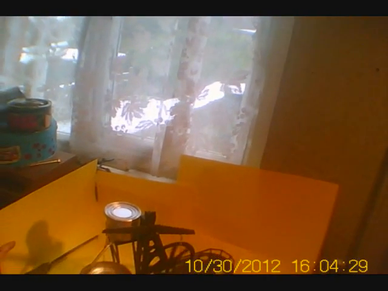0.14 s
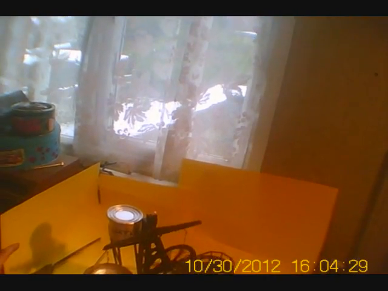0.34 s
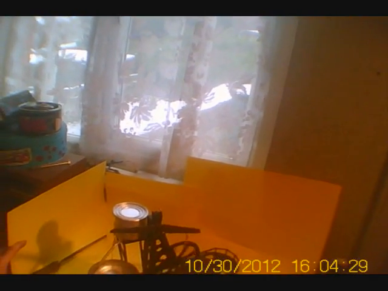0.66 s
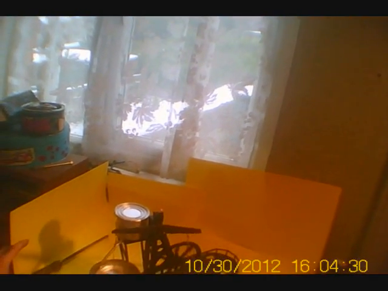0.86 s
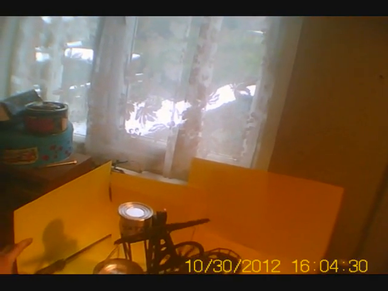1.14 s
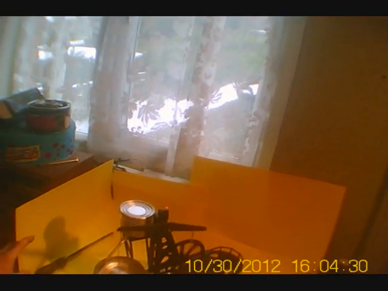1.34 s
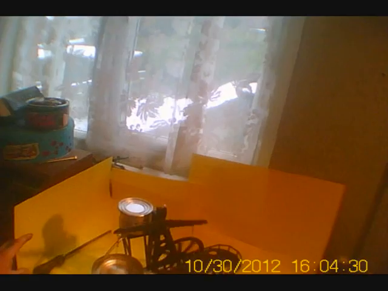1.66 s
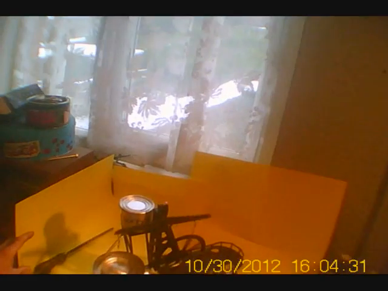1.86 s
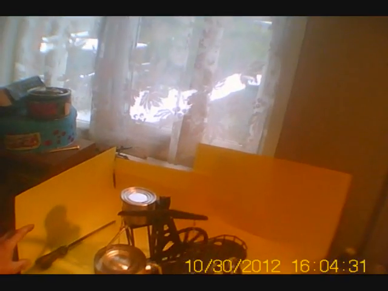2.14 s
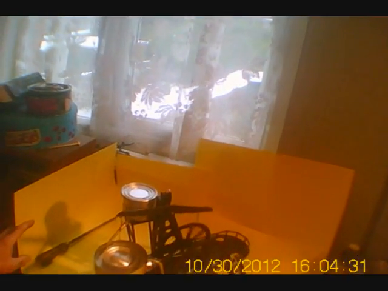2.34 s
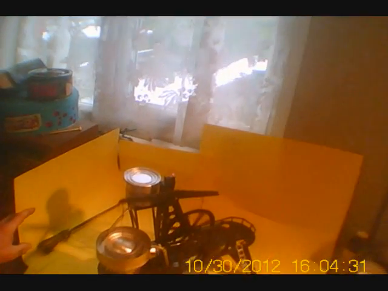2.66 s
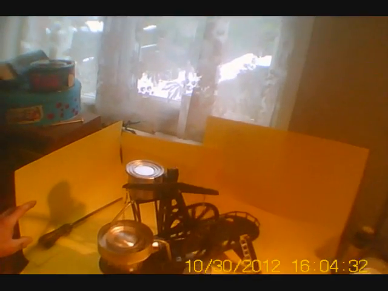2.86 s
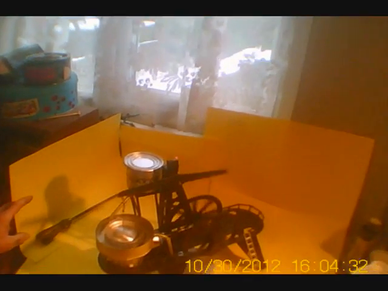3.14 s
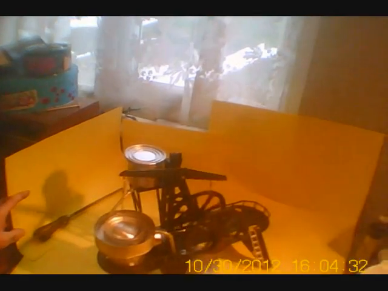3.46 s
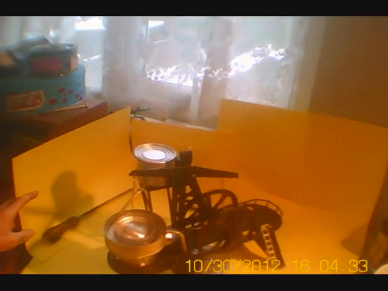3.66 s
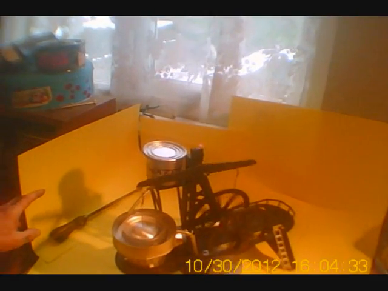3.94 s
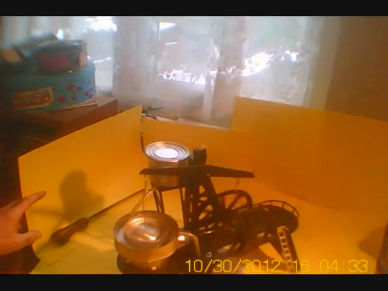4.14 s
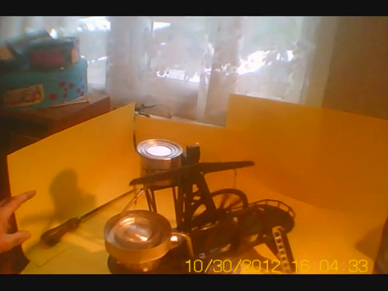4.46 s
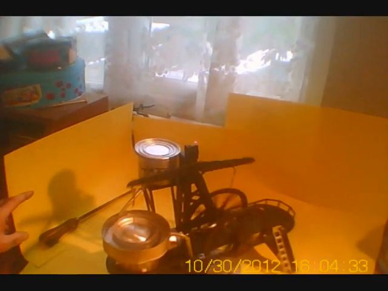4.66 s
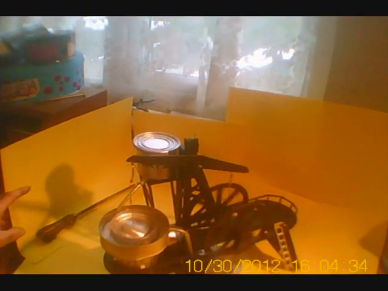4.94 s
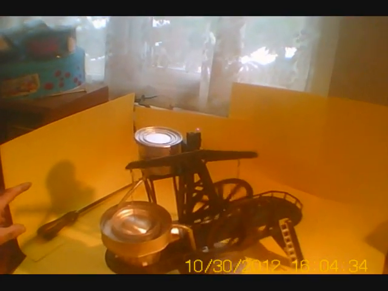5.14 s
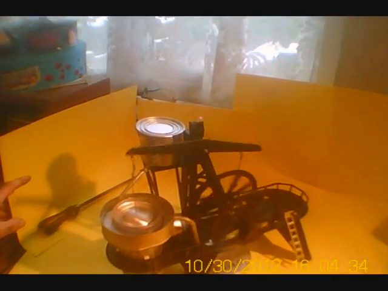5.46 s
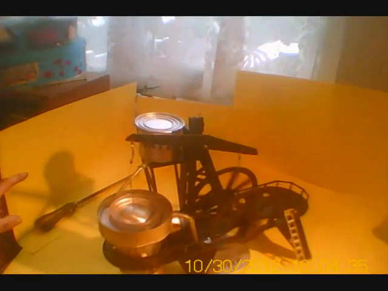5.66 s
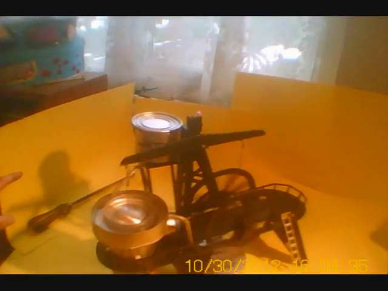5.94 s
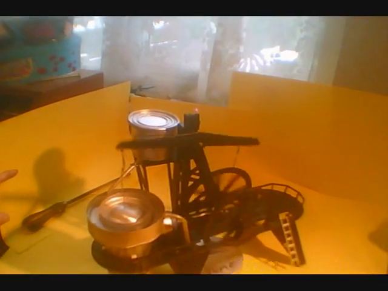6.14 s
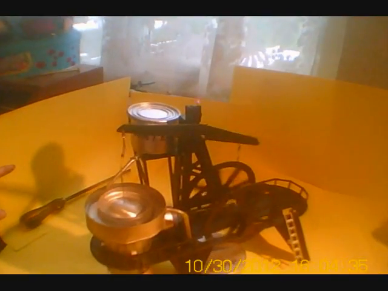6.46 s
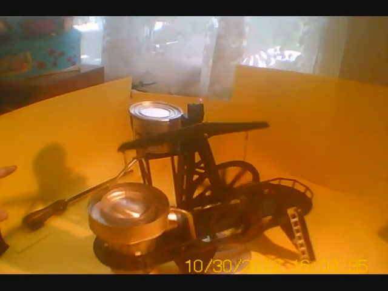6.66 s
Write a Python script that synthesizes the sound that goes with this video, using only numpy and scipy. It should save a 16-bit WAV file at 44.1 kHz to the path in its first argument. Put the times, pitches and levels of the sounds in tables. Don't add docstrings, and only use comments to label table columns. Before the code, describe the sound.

A small engine of tin and wood runs steadily indoors, a metre from a cheap, dull microphone, for about seven seconds. Rumbling air, soft hiss and faint wavering tin hum lie underneath, and a low motor idles far outside until it fades from about 0.6 s, gone by roughly 2 s. Each 0.7-second turn follows the same pattern: a faint upward drag, a padded wooden knock with a tin tick (first at 0.24 s), a softer link knock (0.39 s), a grainy downward piston hiss and tiny seating tap, then the loudest event, a crank slap at 0.56 s. The slap clacks, rebounds rapidly and rings can, board and wire with a brief lid rattle. Slaps recur near 1.26, 1.96, 2.66, 3.37, 4.04, 4.74, 5.44 and 6.14 s; around 2.7 and 3.4 s they ring fuller, and near 4.7 s hardest. Last knocks come at 6.5 and 6.65 s. Short furnished-room tail.

```python
import sys
import numpy as np
from scipy import signal
from scipy.fft import rfft, irfft, next_fast_len
from scipy.io import wavfile
from scipy.ndimage import uniform_filter1d

SR = 44100
rng = np.random.default_rng(int(sys.argv[2]) if len(sys.argv) > 2 else 0)


def voltage_ratio(decibels):
    exponent = np.asarray(decibels, float) / 20
    return 10 ** exponent


def log_audio(samples):
    frames = np.atleast_2d(samples).T
    limited = np.clip(frames, -1, 1)
    pcm = np.round(limited * 32767).astype(np.int16)
    wavfile.write(sys.argv[1], SR, pcm)


N = 300321
T = np.arange(N) / SR


def add(out, s, sound):
    i = max(int(s * SR), 0)
    out[i:i + len(sound)] += sound[:len(out) - i]


def walk(rate):
    k = int(SR / rate)
    steps = np.repeat(rng.standard_normal(N // k + 1), k)
    y = uniform_filter1d(uniform_filter1d(steps, k), k)[:N]
    return y / y.std()


def coloured(points):
    size = next_fast_len(N)
    hz, db = np.transpose(points)
    bin_hz = np.arange(size // 2 + 1) * SR / size + 0.0012
    gain = voltage_ratio(np.interp(np.log(bin_hz), np.log(hz), db, -120, -120))
    y = irfft(rfft(rng.standard_normal(size)) * gain, size)[:N]
    return y / y.std()


def band(hz, width):
    b, a = signal.iirpeak(hz, hz / width, SR)
    once = signal.lfilter(b, a, rng.standard_normal(N))
    y = signal.lfilter(b, a, once)
    return y / y.std()


def ring(hz, t60):
    t = T[:SR // 6]
    return np.sin(2 * np.pi * hz * t) * np.exp(-np.log(1000) * t / np.clip(t60, .005, .2))


def body(modes, scatter_db, detune, rise_s):
    chance = np.clip(rng.standard_normal((len(modes), 2)), -1.5, 1.5)
    y = -sum(voltage_ratio(db + scatter_db * a) * ring(hz * (1 + detune * b), t60)
             for (hz, db, t60), (a, b) in zip(modes, chance))
    y = y * np.sin(np.pi / 2 * np.minimum(T[:len(y)] / rise_s, 1)) ** 2
    return y / np.abs(y).max()


def knocks(events, wood, tin, wood_early_s, tick_late_s, gain_db):
    out = np.zeros(N)
    for s, wood_db, tin_db in events:
        for lag, db in [(0, 0.5), (.017, -2)]:
            thud = body(wood, scatter_db=2.5, detune=.015, rise_s=.003)
            add(out, s + lag - wood_early_s, voltage_ratio(db + wood_db + gain_db) * thud)
        tick = body(tin, scatter_db=3.5, detune=0.0089, rise_s=0.0028)
        add(out, s + tick_late_s, voltage_ratio(tin_db + 3.5) * tick)
    return out


# (frequency [Hz], density [dB per Hz])
AIR = [(60, -8), (100, -1), (200, -7), (300, -9.5), (420, -14), (520, -14.5), (980, -19), (1300, -20),
       (1700, -21.5), (2200, -25.5), (3500, -28.5), (5500, -29), (9500, -31), (11000, -16.5), (14000, -67)]
# (frequency [Hz], density [dB per Hz])
RUMBLE = [(3, 4), (6, -7), (12, -1), (20, -7), (30, -1.5), (40, -5.5), (50, -8), (62, -10.5), (80, -19.5),
          (110, -23.5), (150, -39), (240, -120)]
# (frequency [Hz], level [dB])
WHINE = [(3893, -81), (9600, -86)]


def background():
    air = voltage_ratio(-47 + 0.4 * walk(5)) * coloured(AIR)
    swell = voltage_ratio(0.55 * walk(1.55))
    rumble = voltage_ratio(-40) * coloured(RUMBLE) * swell
    whine = sum(np.sqrt(2) * voltage_ratio(db) * np.sin(2 * np.pi * hz * T) for hz, db in WHINE)
    return air + rumble + whine


# (multiple of its speed [1], level [dB])
MOTOR_ORDERS = [(1, -2.5), (2, -0.5), (3, 2.4)]


def motor():
    speed_hz, level_db, leaves_s, fade_db_s2 = 25.34, -41, 0.57, 37
    phase = 2 * np.pi * np.cumsum(speed_hz * (1 + .005 * walk(5))) / SR
    tone = sum(voltage_ratio(db + .8 * walk(4)) * np.sin(order * phase + order) for order, db in MOTOR_ORDERS)
    return np.sqrt(2) * tone * voltage_ratio(level_db - fade_db_s2 * np.maximum(T - leaves_s, 0) ** 2)


# (frequency [Hz], width [Hz], level [dB])
MURMUR = [(757, 21, -75.5), (1079, 42, -70.5), (1150, 19, -77.5), (1250, 11, -68.5), (1460, 29, -73.5),
          (1666, 7.4, -72), (1870, 7.1, -82)]


def murmur():
    return sum(voltage_ratio(db + 2.27 * walk(8.7)) * band(hz, width) for hz, width, db in MURMUR)


def slap_times():
    turn_s = .697
    return np.append(np.transpose(SLAPS)[0], SLAPS[-1][0] + turn_s)


def stroke(late_s):
    rub_db, rub_lead_s, rise_s, hold_s, rub_fall_db_s = -62, 0.12, 0.013, 0.05, 233
    drag_db, drag_lead_s, drag_rise_db_s, drag_fall_db_s = -69, 0.31, 42, 28
    slap_s = slap_times()
    coming = np.minimum(np.searchsorted(slap_s, T - .03), len(slap_s) - 1)
    to_slap = slap_s[coming] - T + late_s
    t, u = rub_lead_s - to_slap, drag_lead_s - to_slap
    down = np.clip(1 + t / rise_s, 0, 1) * voltage_ratio(rub_db - rub_fall_db_s * np.maximum(t - hold_s, 0))
    up = voltage_ratio(drag_db - np.where(u < 0, -drag_rise_db_s * u, drag_fall_db_s * u))
    return up * np.clip(-t / rise_s, 0, 1) + down


# (frequency [Hz], width [Hz], level [dB])
RUB_BANDS = [(296, 140, 9.5), (630, 580, 5.5), (1236, 270, 5), (1540, 510, 6.5), (1760, 670, -2),
             (4500, 1200, -1), (6640, 900, -4), (8730, 1300, -1.5)]


def rub():
    tin_late_s, tin_below_hz, grain_db = 0.016, 3000, 2.2
    hiss, can = stroke(0.), stroke(tin_late_s)
    return sum((can if hz < tin_below_hz else hiss) * voltage_ratio(db + grain_db * walk(60)) * band(hz, width)
               for hz, width, db in RUB_BANDS)


# (time [s], wood level [dB], tin level [dB])
BEAM_KNOCKS = [
    (0.243, -34, -44.5),
    (0.937, -32.5, -44),
    (1.639, -35, -47),
    (2.342, -38, -42),
    (3.047, -33.5, -42),
    (3.719, -35, -41),
    (4.407, -36, -42),
    (5.119, -33.5, -41.5),
    (5.816, -32.5, -42.5),
    (6.505, -33, -41),
]
# (frequency [Hz], level [dB], t60 [s])
BEAM = [(250, 3, 0.099), (305, -2, 0.071), (373, -5.5, 0.11), (545, -5.5, 0.048), (757, -18, 0.035)]
# (frequency [Hz], level [dB], t60 [s])
BEAM_TIN = [(1120, 4.5, 0.088), (1250, 1, 0.081), (1294, 0.5, 0.089), (1730, 1, 0.057), (1683, -1.5, 0.038)]


def beam_knocks():
    return knocks(BEAM_KNOCKS, BEAM, BEAM_TIN, wood_early_s=0.0018, tick_late_s=-0.00105, gain_db=-2.7)


# (time [s], wood level [dB], tin level [dB])
LINK_KNOCKS = [
    (0.385, -38, -47),
    (1.077, -41, -50.5),
    (1.779, -38, -51),
    (2.484, -39.5, -46.5),
    (3.191, -36, -51),
    (3.867, -35, -51),
    (4.558, -38, -53),
    (5.274, -38.5, -54),
    (5.956, -36.5, -52),
    (6.647, -39.5, -53),
]
# (frequency [Hz], level [dB], t60 [s])
LINK = [(213, -10.5, 0.11), (310, 1, 0.071), (377, -9, 0.27), (426, -11, 0.21), (488, -11, 0.047)]
# (frequency [Hz], level [dB], t60 [s])
LINK_TIN = [(1196, -16, 0.058), (1520, 2, 0.1), (1630, -5, .06)]


def link_knocks():
    return knocks(LINK_KNOCKS, LINK, LINK_TIN, wood_early_s=0.00704, tick_late_s=0.015, gain_db=0.3)


def rod_seats():
    lead_s, wood_db, tin_db = 0.06, -43, -59
    seats = [(s - lead_s, wood_db, tin_db) for s in slap_times()]
    return knocks(seats, BEAM, LINK_TIN, wood_early_s=0., tick_late_s=0., gain_db=-2.0)


# (time [s], level [dB], lean towards the can's low modes [dB])
SLAPS = [
    (0.5589, -17, -3.5),
    (1.257, -17, -6.5),
    (1.9559, -17, -3.5),
    (2.6586, -17.5, 0.5),
    (3.3686, -17.5, .5),
    (4.0411, -16.5, -0.5),
    (4.7364, -16, -3.5),
    (5.4365, -17, -0.5),
    (6.135, -17, 0),
]
# (time after the blow [s], level [dB])
BOUNCES = [
    (-.0014, 0),
    (.0075, -6),
    (0.022, -19.5),
    (0.032, -11.5),
]
# (frequency [Hz], level [dB], t60 [s])
BOARD = [(248.6, -9, 0.14), (318.4, 0.5, 0.1), (375.8, -2.5, 0.093), (398, 0, 0.025), (470.6, -19, 0.29),
         (541, -12, 0.15), (576, -6, 0.091), (638.5, -13, 0.13), (674, -18.5, 0.21), (782, -17, 0.14),
         (845, -46, 0.02)]
# (frequency [Hz], level [dB], t60 [s])
CAN_LOW = [(960, -21, 0.027), (1120, 10, 0.14), (1155, 5, 0.17), (1155, -14, 0.2)]
CAN_MID = [(1370, -27, .05), (1335, -6.5, 0.23), (1385, 9, 0.07), (1376, 12, 0.063), (1350, -6, 0.044),
           (1450, -16, 0.01)]
CAN_HIGH = [(1673, 12, 0.014), (1737, 3, 0.067), (1792, 9, 0.02), (1797, -9, 0.019), (1925, -6, .05),
            (2130, -5, 0.024), (2400, 4, 0.006)]
# (frequency [Hz], level [dB], t60 [s])
WIRE = [(4460, 1, 0.083), (4456, -6, 0.048), (4600, -6.5, 0.087), (4840, -2.5, 0.045), (8020, -4, 0.054)]


def slaps():
    board_db, buzz_db, rattle_db = -7, -35, -14
    grip_s, grip_db, grip_fall_s = .012, -11.5, .001
    out, buzz, rattle = np.zeros((3, N))
    t = T[:SR // 4]
    for s, blow_db, lean_db in SLAPS:
        parts = [(CAN_MID, -3), (CAN_LOW, -7 + lean_db), (CAN_HIGH, -4.5), (WIRE, -28)]
        for lag, db in BOUNCES:
            lag = lag * (1 + .08 * rng.standard_normal())
            tin = sum(voltage_ratio(part_db) * body(modes, scatter_db=2, detune=.012, rise_s=.002)
                      for modes, part_db in parts)
            grip = np.clip((T[:len(tin)] + lag - grip_s) / grip_fall_s, 0, 1) * (lag < grip_s)
            add(out, s + lag, voltage_ratio(blow_db + db + grip_db * grip) * tin)
            board = body(BOARD, scatter_db=1.5, detune=.01, rise_s=.004)
            add(out, s + lag - .003, voltage_ratio(1.1 * db + blow_db + board_db) * board)
        add(buzz, s, voltage_ratio(blow_db + buzz_db) * (1 - np.exp(-t / 0.0018)) * np.exp(-t / 0.035))
        add(rattle, s, voltage_ratio(blow_db + rattle_db) * (1 - np.exp(-t / 0.0094)) * np.exp(-t / 0.027))
    out = signal.sosfilt(signal.butter(2, 195, "high", fs=SR, output="sos"), out)
    lid = voltage_ratio(-3.5) * band(1120, 200) + band(1382, 200) + voltage_ratio(-0.5) * band(1770, 320)
    fizz = band(4320, 2200) + voltage_ratio(-5.0) * band(6830, 1300) + voltage_ratio(7.0) * band(12800, 5300)
    return out + rattle * lid + buzz * fizz


def room(x):
    t60_s, level_db, gap_s = 0.29, -10, 0.0126
    t = T[:SR // 2]
    tail = rng.standard_normal(len(t)) * np.exp(-np.log(1000) * t / t60_s) * (t > gap_s)
    return voltage_ratio(level_db) * signal.fftconvolve(x, tail / np.linalg.norm(tail))[:N]


def scene():
    engine = rub() + beam_knocks() + link_knocks() + rod_seats() + slaps()
    return (background() + motor() + murmur() + engine + room(engine))[None]


def top_cut(x):
    return signal.sosfilt(signal.butter(12, 10980, fs=SR, output="sos"), x)


def record(dry):
    top_hz, offset = 10950, -.0802
    steep = signal.cheby2(10, 50, top_hz * 1.03, fs=SR, output="sos")
    narrow = signal.sosfilt(steep, dry)
    return top_cut(narrow + offset)


dry = scene()
out = record(dry)
log_audio(out)
```